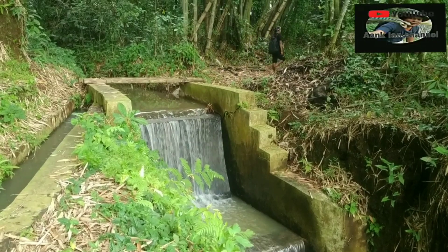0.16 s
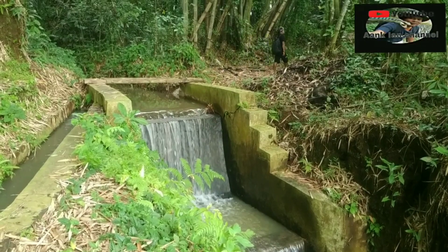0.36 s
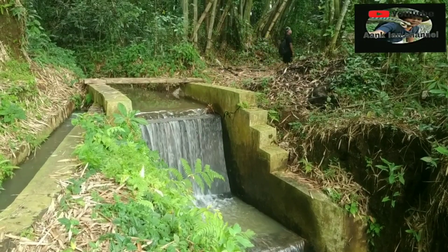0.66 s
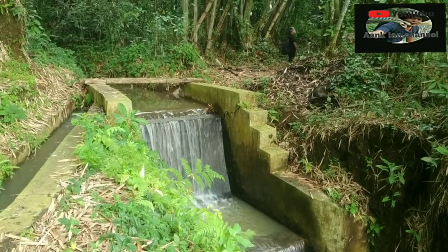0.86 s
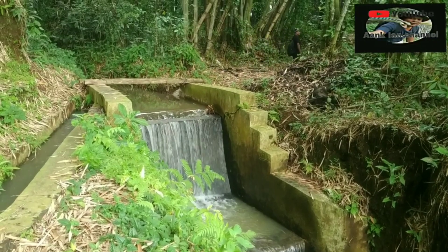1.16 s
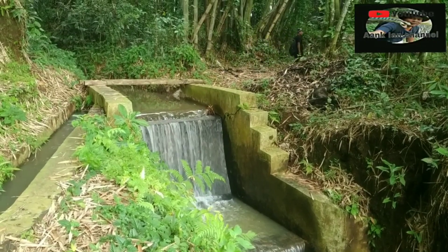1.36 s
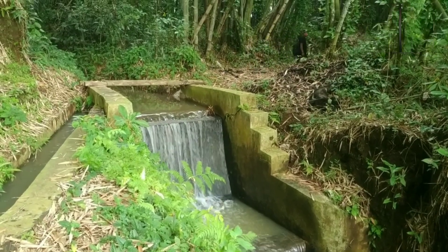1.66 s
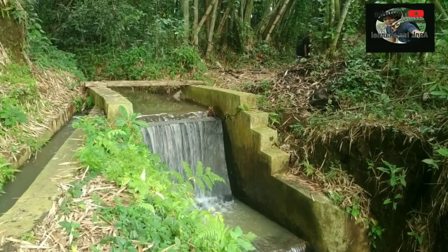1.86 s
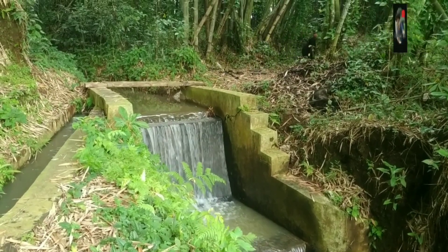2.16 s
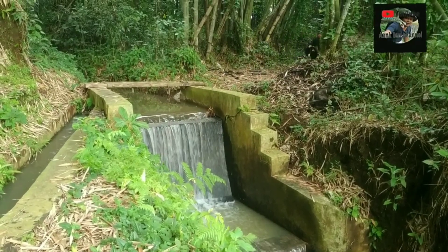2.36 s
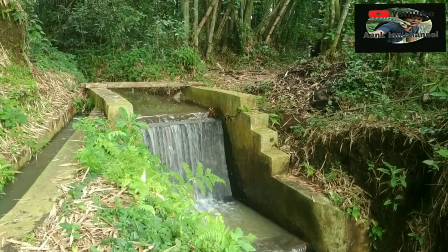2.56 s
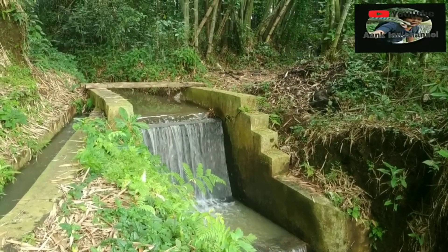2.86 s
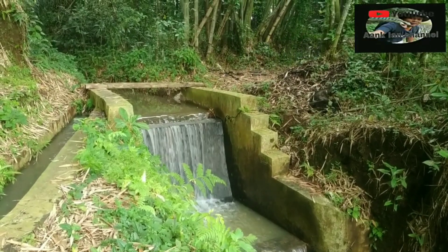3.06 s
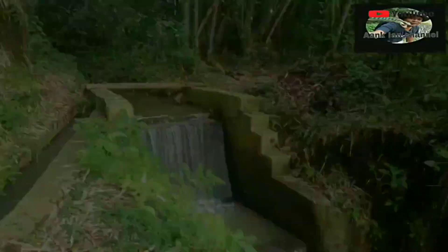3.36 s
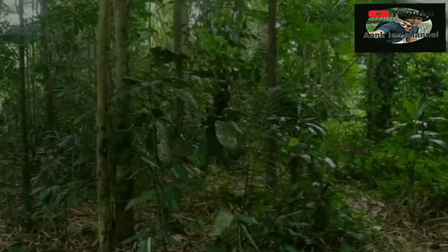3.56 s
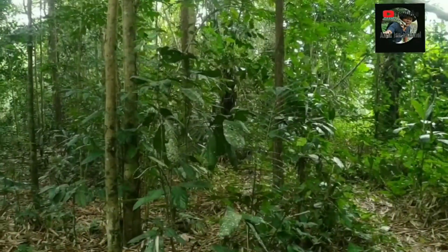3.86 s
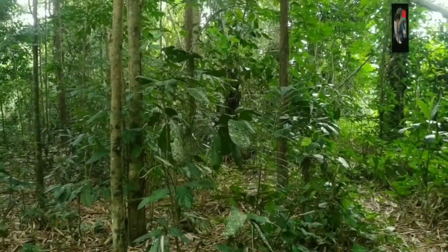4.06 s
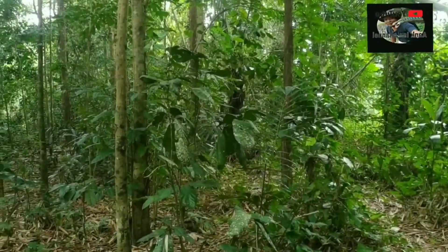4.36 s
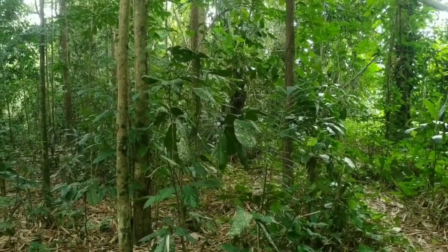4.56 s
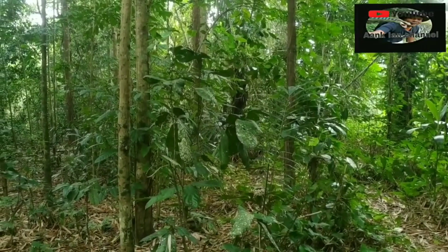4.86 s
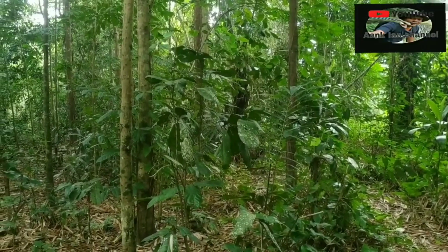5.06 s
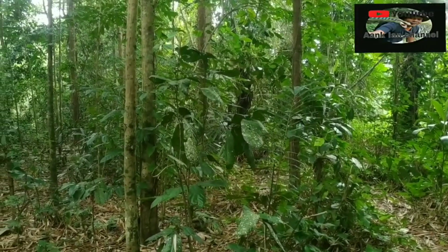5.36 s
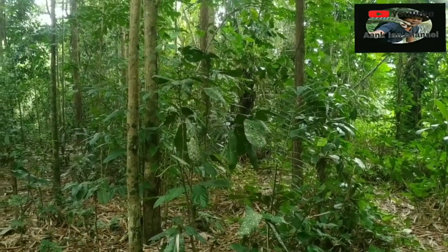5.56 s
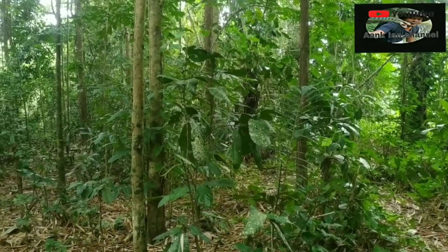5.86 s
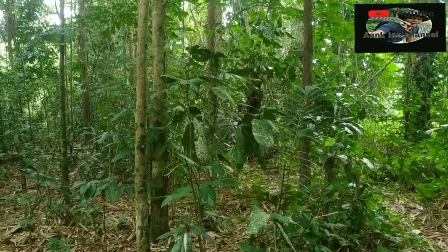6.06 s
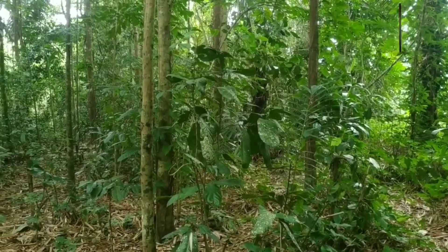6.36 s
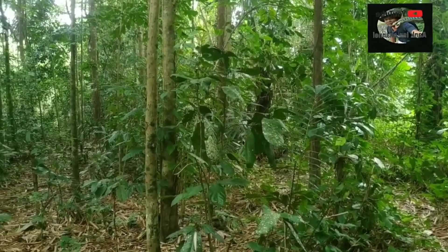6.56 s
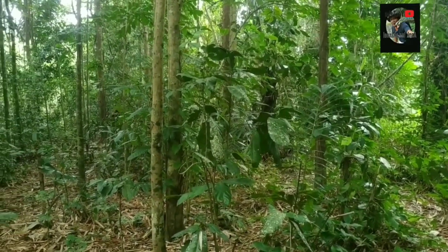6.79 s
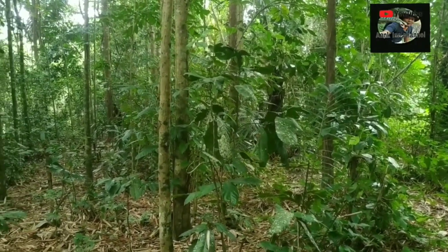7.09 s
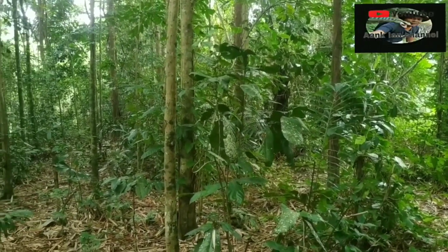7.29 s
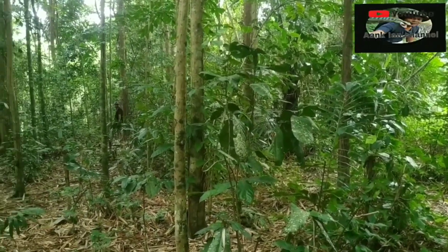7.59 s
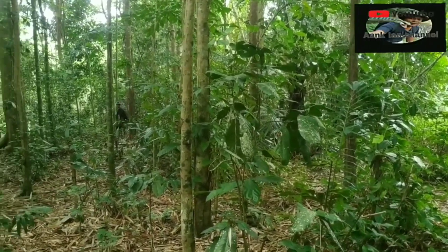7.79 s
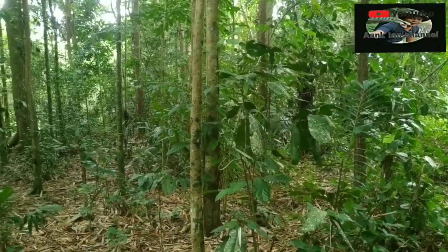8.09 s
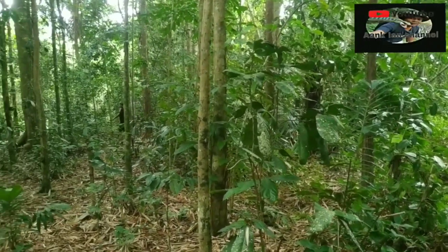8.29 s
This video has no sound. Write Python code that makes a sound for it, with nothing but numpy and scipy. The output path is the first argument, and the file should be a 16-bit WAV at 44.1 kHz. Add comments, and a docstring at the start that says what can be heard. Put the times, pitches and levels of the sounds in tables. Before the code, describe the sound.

From 0 to 3 seconds, water pours over a small concrete weir, close and very loud: a steady, dense, wide rush, full from low mids to bright highs, with uneven surging gurgles of large bubbles and fine fizz of small ones; the highest peaks clip slightly. From 3.0 to 3.5 it fades straight down to a momentary near-silence. From 3.5 to 4 a second place fades in, some sixteen decibels quieter: distant water behind trees, a smooth, even hiss without distinct bubbles, its midrange slightly hollow until about 4. Beneath it a faint distant engine with a low rumble swells until about 4.9, its wavering hum leaning right. It pulls harder and brighter around 5.4 to 6.4, dips at 6.8 as the throttle lifts and pitch drops slightly, then drones on softly with the hiss until the end near 8.4.

```python
"""Water pours over a small concrete weir, close and loud enough to clip the highest peaks.
It fades out and a second spot fades in: far water behind trees, with a distant engine droning under it.
Water is made from flickering noise, with ringing bubbles added at the weir; the engine is harmonics of
its firing rate over a low rumble. Two microphone ports lie a hand apart."""
import sys
import numpy as np
from scipy import signal
from scipy.fft import rfft, irfft, next_fast_len
from scipy.io import wavfile
from scipy.ndimage import uniform_filter1d, map_coordinates

SR = 44100
rng = np.random.default_rng(int(sys.argv[2]) if len(sys.argv) > 2 else 0)


def materialize(psi):
    """Save the field psi as 16-bit PCM at rate SR to the path in sys.argv[1].

    A 1-D psi becomes a single channel; in a 2-D psi each row is a channel.
    """
    bounded = np.clip(np.atleast_2d(psi).T, -1, 1)
    quanta = np.round(bounded * 32767).astype(np.int16)
    wavfile.write(sys.argv[1], SR, quanta)


N = 371763


def weir():
    """The sheet hits the pool: broadband noise, surging gurgle of large bubbles, fizz of small ones."""
    # spectrum of the close fall [f/Hz, relative level/dB per Hz]
    close_spectrum = [(30, -34), (125, -24.5), (165, -8), (200, -3.5), (320, -4), (440, -6.5), (683, -1.5),
                      (940, -5), (1140, -2.5), (1500, -3), (2150, -2), (2330, -1.5), (2600, -2.5),
                      (3300, -6), (5800, -3), (9000, -8.5), (14200, -11), (15300, -11.5)]
    # close fall at the two ports [f/Hz, likeness 0-1, left over right level/dB]
    close_ports = [(95, .2, 2), (140, 0.93, -0.5), (221, 1, 0), (480, 0.8, -1), (696, 0.66, -0.9),
                   (1030, 0.27, -0.5), (1300, 0.46, 0.9), (2050, 0, 0.3), (2400, 0, 1), (3700, 0.17, -1),
                   (4740, 0, 0.4), (5900, 0, 4), (7500, 0.02, -0.2), (12000, 0, 0.5)]
    mean_db, left_lead_s = -6.5, 0.000189

    gurgle = bubbles(centre_hz=593, octaves=0.6, cycles=3.34, spread_db=22.0, count=2500)
    fizz = bubbles(centre_hz=5000, octaves=1.48, cycles=4.3, spread_db=5, count=6000)
    gurgle_db = -23.0 + 4.0 * wobble(2.21)
    water = flickering_noise(patchy_db=0.3, streaky_db=2.5)
    water = water + amp(gurgle_db) * gurgle + amp(-16.5) * fizz
    surge_db = 0.15 * wobble(3.0) + 0.17 * wobble(10.79)
    return amp(mean_db + surge_db) * ports(water, close_spectrum, close_ports, left_lead_s)


def bubbles(centre_hz, octaves, cycles, spread_db, count):
    """Two clouds of trapped air: each bubble rings a few cycles while its pitch rises."""
    u = rng.random((count, 4))  # columns: size, start, cloud, pitch
    hz = centre_hz * 2 ** (octaves * (2 * u[:, 3:] - 1))
    n = np.arange(320)  # samples of one ring
    turns = hz * n / SR
    size = amp(spread_db * u[:, :1]) * np.sqrt(hz / centre_hz)  # small bubbles are short but as energetic
    swell = turns / cycles * np.exp(-3 * turns / cycles)
    rising_phase = 2 * np.pi * turns * (1 + 0.17 * turns / cycles)
    ring = size * swell * np.sin(rising_phase)
    # both clouds lie end to end on one line, then are cut apart
    span = N + len(n)
    start = (u[:, 1:2] * N).astype(int) + (u[:, 2:3] < .5) * span
    cloud = np.bincount((start + n).ravel(), ring.ravel(), 2 * span)
    return unit(cloud.reshape(2, -1)[:, :N])


def flickering_noise(patchy_db, streaky_db):
    """Two white noises whose level flickers at random in broad patches and in narrow streaks,
    the streaks deepening with frequency."""
    hz, _, z = signal.stft(rng.standard_normal((2, N + 1024)), SR, nperseg=1024)

    def field(size):
        """Random level in blobs some 80 ms long and size bins wide, with slow drift taken out."""
        wide = uniform_filter1d(rng.standard_normal(z.shape[1:]), size=size, axis=0)
        brief = uniform_filter1d(wide, size=7, axis=1)
        drift = uniform_filter1d(wide, size=28, axis=1)
        return unit(brief - drift)

    depth = (hz[:, None] / 3050) ** .3  # 1 at 3050 Hz
    gain = amp(patchy_db * field(size=10) + streaky_db * depth * field(size=2))
    return unit(signal.istft(z * gain, nperseg=1024)[1][:, :N])


def far_water():
    """Distance blends the bubbles into an even noise; its midrange is thin at first, then fills in."""
    # spectrum of the water behind the trees [f/Hz, relative level/dB per Hz]
    far_spectrum = [(30, -42), (100, -26), (149, -14), (196, -6), (300, -10), (430, -8), (700, -6),
                    (1500, -5), (2400, -4.5), (3000, -4.5), (4000, -6), (6400, -5.5), (9000, -10),
                    (15300, -16.5)]
    # far water at the two ports [f/Hz, likeness 0-1, left over right level/dB]
    far_ports = [(50, 0.65, .4), (170, 1, .2), (300, 0.78, -.2), (450, 0.45, -0.82), (750, 0.45, 1.1),
                 (1030, 0.29, .2), (1450, 0.46, 1.4), (1900, 0.14, .5), (2400, 0.2, 1.1),
                 (4000, 0.033, -0.25), (6000, 0.05, .8), (7700, 0.03, -.4), (14000, 0.039, -0.51)]
    mean_db, left_lead_s = -22.5, 0.000402  # level once the midrange is full
    hollow_hz, hollow_width_hz, hollow_share = 1060, 270, 0.33
    fill_start_s, fill_length_s = 3.9, .15

    surge_db = 0.18 * wobble(3.22) + 0.27 * wobble(11)
    noise = flickering_noise(patchy_db=0.1, streaky_db=2.5)
    water = ports(noise, far_spectrum, far_ports, left_lead_s)
    middle = filtered(water, lambda hz: np.exp(-((hz - hollow_hz) / hollow_width_hz) ** 2))
    missing = hollow_share * (1 - ramp(fill_start_s, fill_length_s))
    return amp(mean_db + surge_db) * (water - missing * middle)


def engine():
    """Harmonics of the firing rate; paths through the trees make the higher ones waver; rumble lies below."""
    # what of the exhaust note carries, before load tilts it [f/Hz, relative level/dB]
    exhaust = [(100, -42), (165, -11), (200, -1), (240, 4.5), (280, -3), (320, -5), (360, -4.5),
               (400, -2.5), (445, -7.5), (490, -17), (650, -35), (1000, -49)]
    cruise_hz, eased_hz = 40.2, 38.8  # firings a second before and after the engine eases off
    ease_s, ease_length_s = 6.8, .6  # middle and length of the easing
    base_db, arrive_s, arrive_db_per_s = -42, 4.87, 15  # swells up to the base level until arrive_s
    lift_s, lift_db, lift_width_s = 6.8, 4, 0.56  # quieter while the throttle lifts; width to each side
    pull_start_s, pull_end_s, pull_rise_s, pull_fall_s = 5.35, 6.4, 0.59, 0.47  # span under full load
    idle_tilt_db, pull_tilt_db, pull_gain_db = -4, 7, 0.5  # dB per octave off and under load; load gain

    t = np.arange(N) / SR
    rate = cruise_hz + (eased_hz - cruise_hz) * ramp(ease_s - ease_length_s / 2, ease_length_s)
    load = ramp(pull_start_s - pull_rise_s, pull_rise_s) - ramp(pull_end_s, pull_fall_s)
    tilt_db = idle_tilt_db + (pull_tilt_db - idle_tilt_db) * load
    lift = np.clip(1 - abs(t - lift_s) / lift_width_s, 0, 1)
    approach_db = arrive_db_per_s * np.clip(arrive_s - t, 0, None)
    swing_db = pull_gain_db * load - lift_db * lift - approach_db

    cycle = 2 * np.pi * np.cumsum(rate) / SR
    note = np.zeros(N)
    for k in range(4, 14):
        waver_db = 4 * k / 9 * np.tanh(wobble(6.5))
        strength = amp(along(exhaust, k * rate)[0] + tilt_db * np.log2(k / 6) + waver_db)
        phase = 2 * np.pi * rng.random() + 0.13 * k * wobble(8)
        note += strength * np.sin(k * cycle + phase)
    # the note reaches the right port 0.3 ms sooner
    late = lambda hz: np.exp(-2j * np.pi * hz * np.array([[.0003], [0]]))
    return amp(base_db + swing_db) * filtered(unit(note), late) + rumble(swing_db)


def rumble(engine_swing_db):
    """Low noise that travels with the engine and follows a share of its level swings."""
    # spectrum of the rumble [f/Hz, relative level/dB per Hz]
    rumble_spectrum = [(30, -45), (100, -27), (150, -7), (200, -2.5), (300, -0.5), (430, -7), (600, -22),
                       (1000, -50)]
    # rumble at the two ports [f/Hz, likeness 0-1, left over right level/dB]
    rumble_ports = [(50, .6, 0), (200, 1, 0), (450, 0.5, -2)]
    base_db, follows = -41.5, 0.22
    left_lead_s = -.0005  # negative: it comes from the right

    noise = ports(rng.standard_normal((2, N)), rumble_spectrum, rumble_ports, left_lead_s)
    level_db = base_db + follows * engine_swing_db + 0.8 * wobble(2.39)
    return amp(level_db) * noise


def ports(pair, spectrum, likeness, lead_s):
    """Colours two unrelated signals and mixes them as two spaced ports hear a wide source."""
    head_on_hz = 250  # well below this the sound arrives at both ports together

    def split(hz):
        """Gains of the shared and the opposed part that give the wanted likeness."""
        turn = np.arccos(np.clip(along(likeness, hz)[0], 0, 1)) / 2
        return amp(along(spectrum, hz)[0]) * [np.cos(turn), np.sin(turn)]

    def lean(hz):
        """Half of the lead and of the level gap goes to each side."""
        side = np.array([[.5], [-.5]])
        lead = lead_s * side * hz ** 2 / (hz ** 2 + head_on_hz ** 2)
        return np.exp(2j * np.pi * hz * lead) * amp(along(likeness, hz)[1] * side)

    shared, own = filtered(pair, split)
    return unit(filtered(np.array([shared + own, shared - own]), lean))


def amp(db):
    """Decibels to gain."""
    return 10 ** (np.asarray(db) / 20)


def unit(x):
    """Scaled to rms 1."""
    return x / np.sqrt(np.mean(x ** 2) + 1e-20)


def along(points, hz):
    """Each column after the frequency, read on a log frequency axis."""
    f, *cols = np.transpose(points)
    return [np.interp(np.log(hz + 1), np.log(f + 1), c) for c in cols]


def wobble(rate):
    """A smooth random curve, rate knots a second."""
    knots = rng.standard_normal(int(N * rate / SR) + 4)
    return map_coordinates(knots, [np.arange(N) * rate / SR])


def filtered(x, response):
    """x with its spectrum multiplied by a complex response of frequency."""
    m = next_fast_len(N + 8192)
    return irfft(rfft(x, m) * response(np.fft.rfftfreq(m, 1 / SR)), m)[..., :N]


def ramp(start_s, length_s):
    """Rises straight from 0 to 1."""
    return np.clip((np.arange(N) / SR - start_s) / length_s, 0, 1)


def scene():
    """The close fall fades out, the spot by the trees fades in; the straight fades barely overlap."""
    fade_out_s, fade_in_s, fade_length_s = 2.994, 3.478, 0.5
    close = (1 - ramp(fade_out_s, fade_length_s)) * weir()
    distant = ramp(fade_in_s, fade_length_s) * (far_water() + engine())
    return close + distant


def record(dry):
    """The loudest peaks clip at full scale; then nothing passes above the band limit."""
    top_hz = 15520
    clipped = np.clip(dry, -1, 1)
    return filtered(clipped, lambda hz: hz < top_hz)


dry = scene()
out = record(dry)
materialize(out)
```